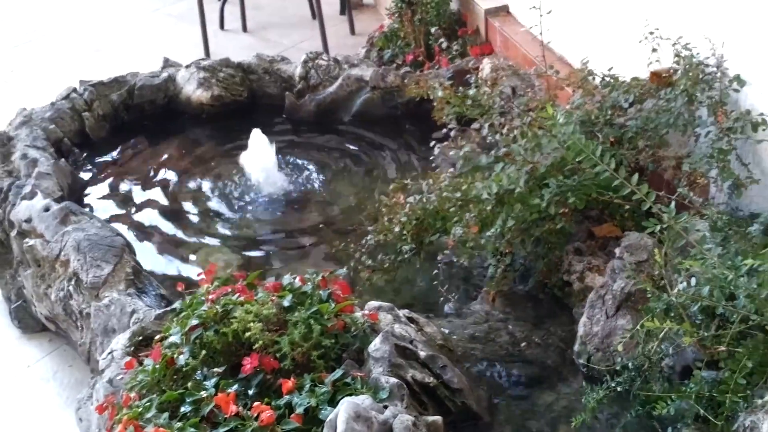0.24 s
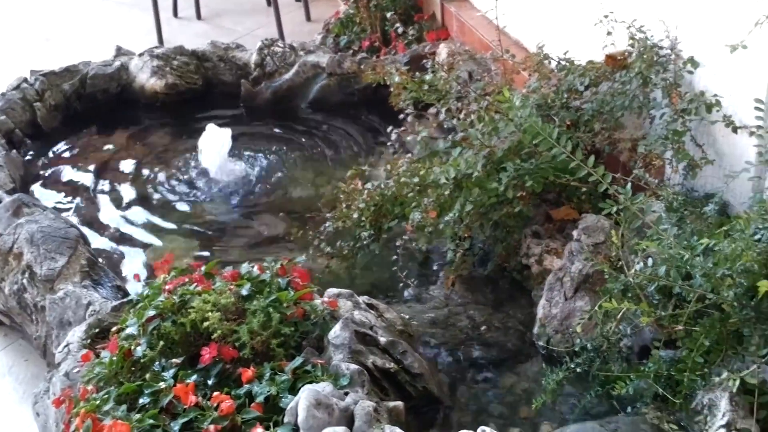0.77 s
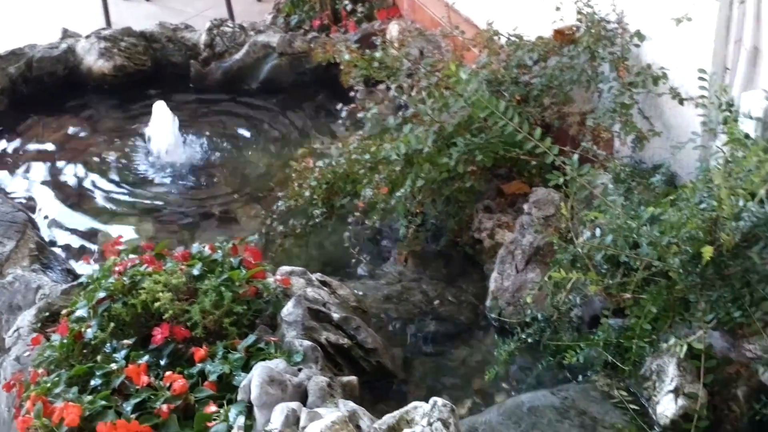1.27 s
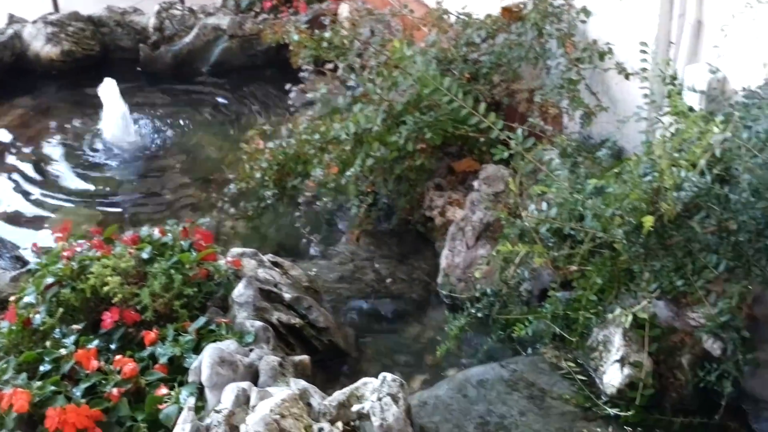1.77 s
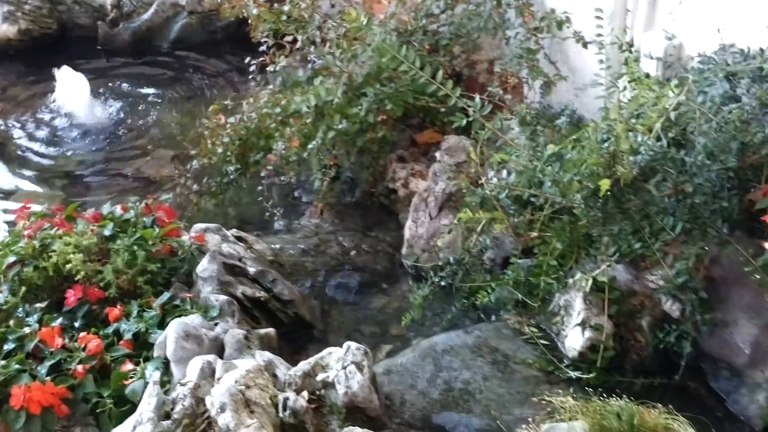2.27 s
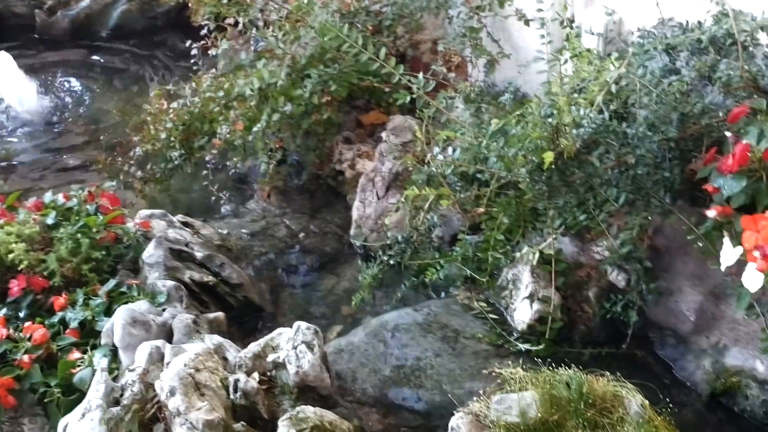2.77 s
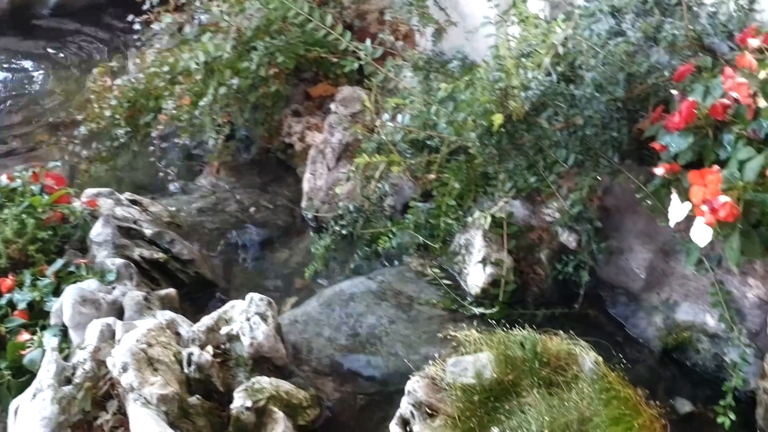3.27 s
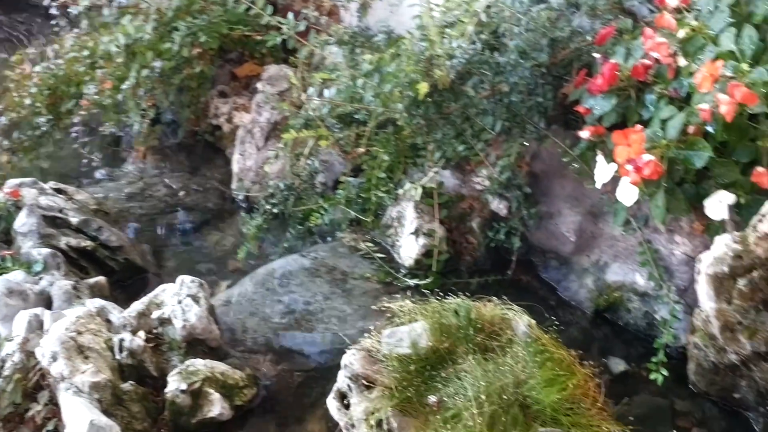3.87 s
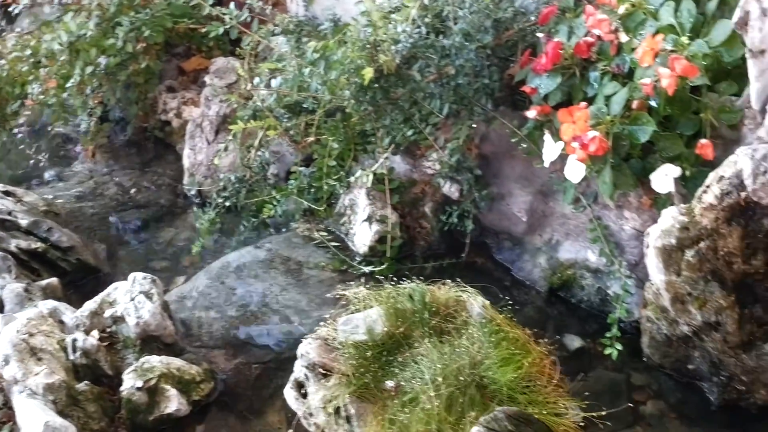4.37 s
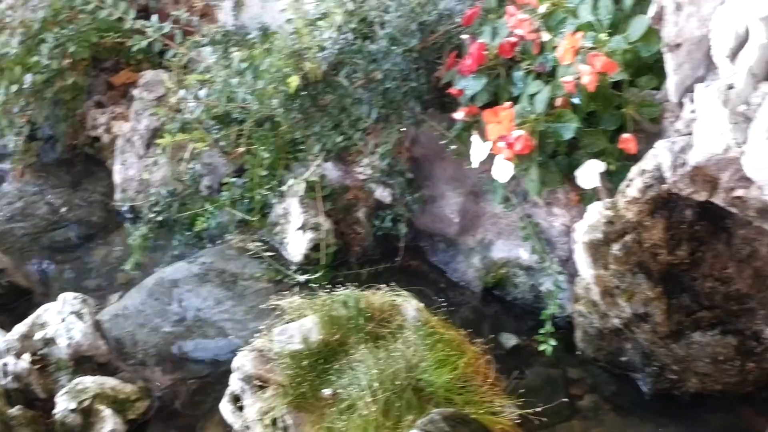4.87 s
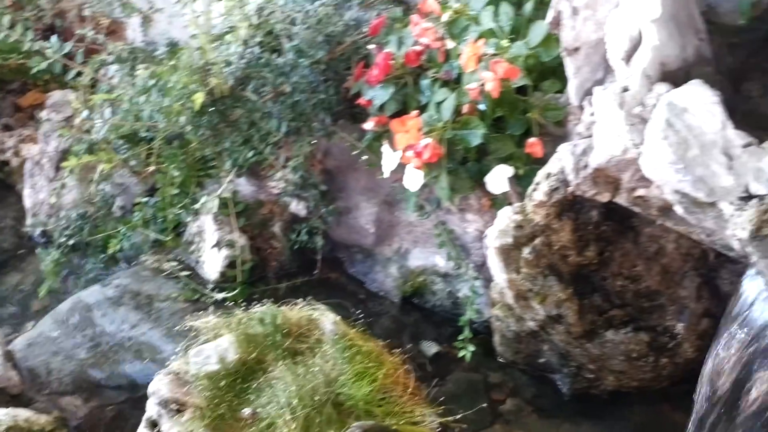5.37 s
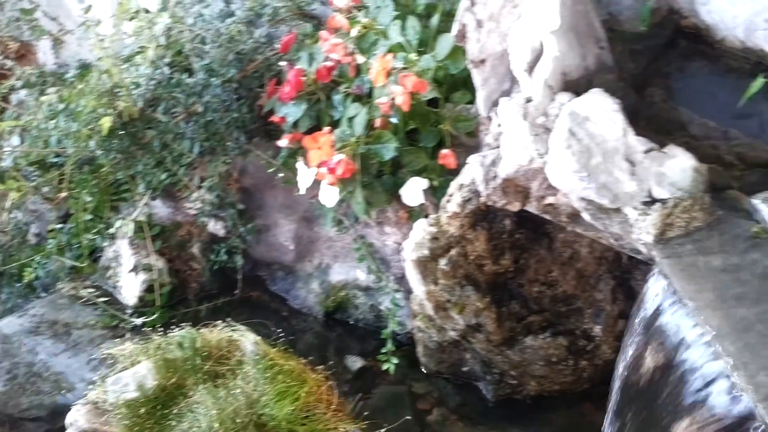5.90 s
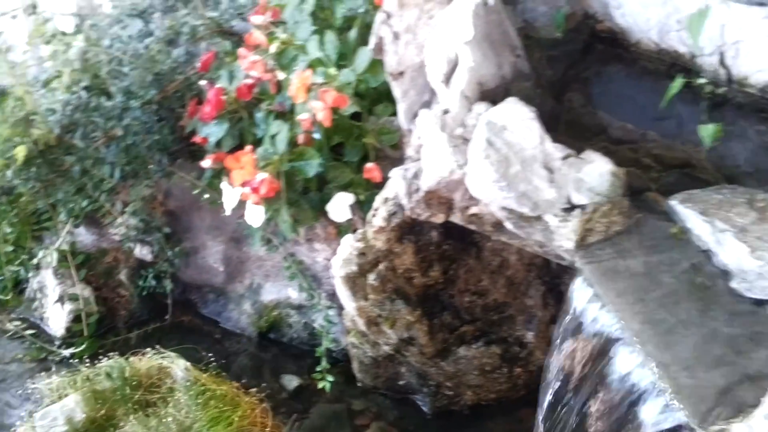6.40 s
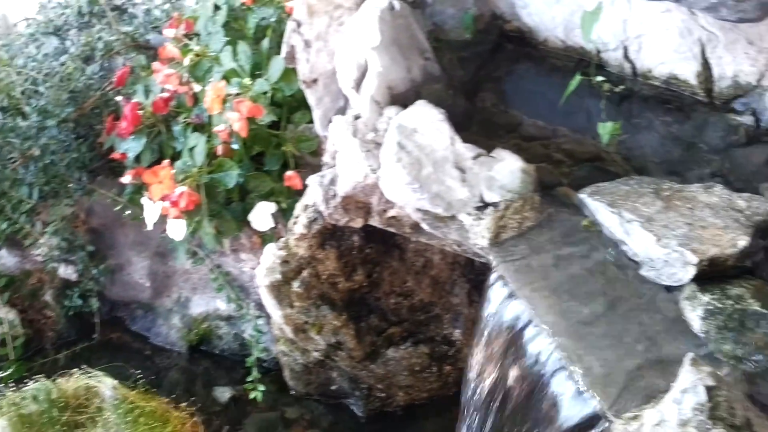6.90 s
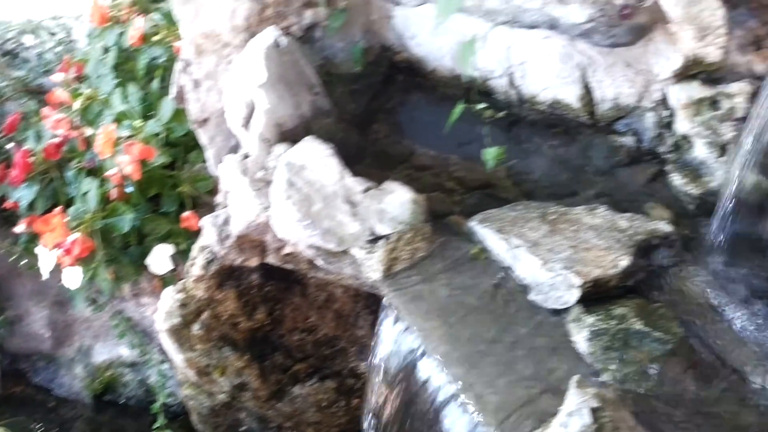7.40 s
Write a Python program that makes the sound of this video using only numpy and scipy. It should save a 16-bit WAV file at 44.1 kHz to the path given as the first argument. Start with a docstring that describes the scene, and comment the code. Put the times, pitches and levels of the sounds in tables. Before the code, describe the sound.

Steady hissing, trickling water in a rock garden, full of crisp slaps and bubbly plops, shifting from bright jet splatter to lower waterfall babble.

```python
"""A frothy jet falls back into the basin of a rock-garden fountain; a sheet of water spills over
a stone lip, and a pool gurgles between. Each is a wash of noise bands plus a fizz of single ringing bubbles.
Slaps (clicks with noise), plops (rising notes) and spray (bright ticks) fall at set and random times.
The microphone turns slowly from jet to waterfall; echoes, ringing stone, a rumble and a faint hum join in."""
import sys
import numpy as np
from scipy import signal
from scipy.io import wavfile

SR = 44100
rng = np.random.default_rng(int(sys.argv[2]) if len(sys.argv) > 2 else 0)


def unload_wav(signal):
    """Save mono or channel-first audio to the path in sys.argv[1] as 16-bit WAV at rate SR, clipped to [-1, 1]."""
    wavfile.write(
        sys.argv[1],
        SR,
        np.round(np.clip(np.atleast_2d(signal).T, -1, 1) * 32767).astype(np.int16),
    )


N = 337365   # length in samples


def from_db(db):
    """Turn decibels into a gain."""
    return 10 ** (np.asarray(db) / 20)


def rms_one(x):
    """Scale a signal to an average (rms) strength of 1."""
    return x / np.sqrt(np.mean(x ** 2) + 1e-20)


def drift(rate_hz):
    """Slow random wandering of spread 1: noise smoothed twice, worked out at every 40th sample."""
    step = 40
    r = np.exp(-2 * np.pi * rate_hz * step / SR)
    noise = rng.standard_normal(N // step + 2002)
    slow = signal.lfilter([1], [1, -2 * r, r * r], noise)[2000:]   # skip the filter's start
    return np.interp(np.arange(N) / step, np.arange(len(slow)), rms_one(slow))


def ring(clicks, hz, t60):
    """Each click sets off a sine that fades by 60 dB in t60 seconds, as in a struck bubble."""
    r = from_db(-60 / (t60 * SR))
    w = 2 * np.pi * hz / SR
    return signal.lfilter([0, np.sin(w)], [1, -2 * r * np.cos(w), r * r], clicks + 1e-18)


def add(out, s, sound):
    """Mix a short sound in at a time in seconds."""
    at = round(s * SR)
    out[at:at + len(sound)] += sound[:N - at]


def chirp(t, hz, rise, t60):
    """A bubble's note: quick onset, then a fade, with the pitch rising as it nears the surface."""
    note = np.sin(2 * np.pi * hz * t * (1 + rise * t / t60))
    onset = 1 - np.exp(-.6 * hz * t)
    return note * from_db(-60 * t / t60) * onset


# How strongly each source is heard as the microphone turns and the water surges, before the layer gains:
# (t/s, jet level/dB, waterfall level/dB, pool level/dB)
SOURCE_LEVELS = [(0.0, -27, -34, -38), (0.45, -26, -31.5, -36.5), (0.74, -28, -34, -38.5),
                 (1.17, -26, -33.5, -35.5), (1.73, -28.5, -34.5, -37.5), (2.15, -26, -31, -36.5),
                 (2.79, -31, -34.5, -38.5), (3.26, -29, -33, -34.5), (3.642, -33, -34, -36.5),
                 (4.67, -34, -34, -37.5), (5.88, -34.5, -31.5, -37), (6.44, -33, -31, -37.5),
                 (7.01, -31, -29, -38), (7.46, -31.5, -31.5, -39.5), (7.65, -31, -27.5, -33.5)]


def flow_at(s):
    """Levels in dB of jet, waterfall and pool at the given times, joined by straight lines."""
    times, *levels_db = np.transpose(SOURCE_LEVELS)
    return [np.interp(s, times, db) for db in levels_db]


def band_powers(spectrum, main_band, hz):
    """Power of a source in each log-spaced band, summing to 1 over its main band."""
    known_hz, db = np.transpose(spectrum)
    per_hz = from_db(2 * np.interp(np.log(hz), np.log(known_hz), db, left=-90, right=-90))
    power = hz * per_hz   # higher bands are wider
    in_main = (hz > main_band[0]) & (hz < main_band[1])
    return power / power[in_main].sum()


# Tone colour of the jet: (f/Hz, relative level per Hz/dB)
JET_SPECTRUM = [(1470, -67), (2500, -13), (2850, 11.5), (3280, -12), (4080, 4), (5970, 10.5), (7890, 3),
                (9960, -5), (14800, -12), (16000, -4)]
# Tone colour of the waterfall: (f/Hz, relative level per Hz/dB)
WATERFALL_SPECTRUM = [(650, -19.5), (1100, -7), (1330, -8.5), (1610, -3), (1910, 0), (2260, -2), (2450, -4),
                      (2650, -1.5), (3480, -2.5), (3830, -0.5), (5040, -2), (5450, -41), (8240, -14),
                      (9000, -23.5), (11700, -28), (19800, -120)]
# Tone colour of the pool: (f/Hz, relative level per Hz/dB)
POOL_SPECTRUM = [(90, -30), (134, -28), (164, 3), (221, 2), (370, -11.5), (416, -3), (483, 0), (662, -1),
                 (744, -15.5), (988, 2.5), (1170, -9), (1230, 0), (1600, -2.5), (2080, -37), (3520, -120)]
# Where the level of jet, waterfall and pool counts: (lowest f/Hz, highest f/Hz)
SOURCE_BANDS = [(4500, 12000), (1400, 4000), (150, 1300)]


def band_gains(hz):
    """Gain over time of every band: the powers of the three sources add up."""
    heard = from_db(2 * np.array(flow_at(np.arange(N) / SR)))
    spectra = (JET_SPECTRUM, WATERFALL_SPECTRUM, POOL_SPECTRUM)
    powers = [band_powers(spectrum, band, hz) for spectrum, band in zip(spectra, SOURCE_BANDS)]
    return (np.sqrt(share @ heard) for share in np.transpose(powers))


WASH_DB = -7.5
SURGE_DB, SURGE_BELOW_HZ = 3, 400   # the low wash gurgles unevenly


def wash(churn, churn_db, patchy_db):
    """Countless bubbles blur into sixth-octave noise bands that swell with the churn and flicker alone."""
    edges = 25 * 2 ** (np.arange(57) / 6)
    white = rng.standard_normal((2, N))
    out = np.zeros(N)
    surge = from_db(SURGE_DB * drift(11.0))
    for k, gain in enumerate(band_gains(np.sqrt(edges[1:] * edges[:-1]))):
        band_filter = signal.butter(2, edges[k:k + 2], "band", fs=SR, output="sos")
        band = signal.sosfilt(band_filter, white[k % 2])   # neighbours use different noise
        if edges[k] < SURGE_BELOW_HZ:
            gain = gain * surge
        flicker = from_db(churn_db * churn + patchy_db * drift(44))
        out += gain * flicker * rms_one(band)
    return out


FIZZ_DB, BURBLE_DB = -7.5, -7.5   # short bubbles, and longer-singing ones
SIZE_SPREAD_DB = 2.5


def fizz(churn, per_s, cycles, clump_db):
    """Single bubbles born in clumps, mostly small; each swells and dies at the pitch of its size."""
    strength = from_db(SIZE_SPREAD_DB * np.minimum(rng.exponential(1, N), 4.0)) * rng.choice([-1, 1], N)
    born = rng.random(N) < per_s * from_db(clump_db * churn) / SR
    pitches = np.geomspace(170, 15500, 48)
    odds = np.sqrt(pitches) / np.sqrt(pitches).sum()   # small, high bubbles are the commonest
    dealt = rng.choice(len(pitches), N, p=odds)
    out = np.zeros(N)
    for k, gain in enumerate(band_gains(pitches)):
        hz, t60 = pitches[k], cycles / pitches[k]
        clicks = strength * born * (dealt == k)
        pinched_off = ring(ring(clicks, hz, t60), hz, 0.16 * t60)   # pinch-off takes a few cycles
        out += gain * rms_one(pinched_off)
    return out


RUMBLE_DB, RUMBLE_HZ, RUMBLE_LUMP_DB = -82, 65, 4.5
RUMBLE_FOLLOWS = 2.5   # power of the froth gain
HUM_HZ, HUM_DB, HUM_WAVER_DB = 100, -71, -3


def rumble(froth):
    """Lumpy low-passed noise swells with the froth; a faint sine hum comes and goes."""
    low_pass = signal.butter(2, RUMBLE_HZ, fs=SR, output="sos")
    low = signal.sosfilt(low_pass, rng.standard_normal(N))
    lumps = from_db(RUMBLE_DB + RUMBLE_LUMP_DB * drift(4.0)) * froth ** RUMBLE_FOLLOWS * rms_one(low)
    hum = np.sin(2 * np.pi * HUM_HZ * np.arange(N) / SR)
    return lumps + from_db(HUM_DB + HUM_WAVER_DB * drift(1.5)) * hum


SPRAY_PER_S, SPRAY_CYCLES = 300, 20
SPRAY_DB = -4   # relative to the jet
SPRAY_HZ = (6500, 7600, 9000, 10800, 13000)
SPRAY_TILT_DB = -9   # per octave of droplet pitch


def spray():
    """Lone droplets off the jet tick on stone: brief high ringing of uneven size and pitch."""
    sizes = from_db(5.3 * np.minimum(rng.exponential(1, N), 2.5)) * rng.choice([-1, 1], N)
    lands = rng.random(N) < SPRAY_PER_S / SR
    dealt = rng.integers(0, len(SPRAY_HZ), N)
    ticks = np.zeros(N)
    for k, hz in enumerate(SPRAY_HZ):
        tilt = from_db(SPRAY_TILT_DB * np.log2(hz / SPRAY_HZ[0]))
        ticks += tilt * ring(sizes * lands * (dealt == k), hz, SPRAY_CYCLES / hz)
    jet_db = flow_at(np.arange(N) / SR)[0]
    return from_db(jet_db + SPRAY_DB) * ticks


# Small bubbles of jet, waterfall and pool: (typical f/Hz, level above its source/dB)
SMALL_BUBBLES = [(3010, -3.5), (1900, 0), (900, 1.5)]
# How many small bubbles each source gets: (jet, waterfall, pool)
SMALL_BUBBLE_COUNTS = (320, 620, 300)
PLOP_PITCH_SPREAD, PLOP_SPREAD_DB, SMALL_PLOP_CYCLES = 0.201, 1.5, 50


def small_plops():
    """Random bubbles that follow the level of their source; larger, lower ones ring longer."""
    rows = []
    for k, ((typical_hz, above_db), count) in enumerate(zip(SMALL_BUBBLES, SMALL_BUBBLE_COUNTS)):
        s = rng.random(count) * (N - 1) / SR
        pitch, size = rng.standard_normal((count, 2)).T
        hz = typical_hz * np.exp(PLOP_PITCH_SPREAD * pitch)
        db = flow_at(s)[k] + above_db + PLOP_SPREAD_DB * size
        rows += zip(s, db, hz, SMALL_PLOP_CYCLES / hz)
    return rows


# Loud trapped bubbles: (t/s, level/dB, f/Hz, time to fade 60 dB/s)
LOUD_PLOPS = [(0.008, -19, 2460, 0.028), (0.104, -23.5, 1040, 0.041), (0.115, -19.5, 660, 0.034),
              (0.139, -25, 900, 0.041), (0.138, -22, 3050, 0.03), (0.15, -22, 2160, 0.034),
              (0.175, -35, 1790, 0.03), (0.22, -24, 1760, 0.029), (0.25, -34, 1710, 0.24),
              (0.319, -20.5, 2840, 0.03), (0.352, -24, 2900, 0.04), (0.432, -20, 2820, 0.039),
              (0.433, -13.5, 1750, 0.045), (0.435, -15, 1950, 0.035), (0.588, -21, 1640, 0.034),
              (0.63, -24, 1690, 0.034), (0.64, -20, 2900, 0.04), (0.661, -28, 2720, 0.04),
              (0.679, -20, 3240, 0.025), (0.8, -24, 3900, 0.025), (0.654, -24, 1760, 0.025),
              (0.742, -23, 1430, 0.03), (0.81, -22, 1850, 0.039), (1.247, -25, 1666, 0.04),
              (1.987, -25, 1440, 0.033), (2.227, -23, 1290, 0.03), (2.342, -29, 1640, 0.03),
              (2.448, -15, 1620, 0.019), (2.767, -16, 1310, 0.023), (2.855, -18.5, 1005, 0.033),
              (3.051, -32, 944, 0.11), (3.115, -22, 1470, 0.029), (3.127, -28.5, 1715, 0.21),
              (3.13, -25, 510, 0.069), (3.14, -28, 1250, 0.05), (3.17, -20, 1780, 0.026),
              (3.211, -24, 1400, 0.046), (3.23, -25, 990, 0.09), (3.25, -21, 1200, 0.033),
              (3.252, -22, 880, 0.035), (3.26, -34, 1750, 0.04), (3.269, -26, 1320, 0.056),
              (3.288, -25, 1210, 0.05), (3.31, -30, 900, 0.069), (3.346, -21, 1370, 0.027),
              (3.346, -26, 1760, 0.03), (3.501, -20, 1410, 0.054), (3.532, -21.5, 1750, 0.046),
              (3.789, -16, 1615, 0.039), (3.846, -21, 1350, 0.021), (3.866, -7.5, 1490, 0.011),
              (3.588, -23, 1750, 0.025), (4.013, -29, 800, 0.056), (4.139, -25, 950, 0.034),
              (4.568, -24, 1740, 0.022), (4.612, -22, 2070, 0.039), (4.631, -22, 1480, 0.04),
              (4.632, -21, 1180, 0.034), (4.675, -27, 1730, 0.039), (4.649, -28, 1730, 0.04),
              (4.71, -25, 1690, 0.03), (4.69, -24, 2120, 0.037), (4.715, -24, 2340, 0.03),
              (4.754, -23.5, 1760, 0.03), (4.755, -22, 2250, 0.03), (4.755, -27, 1000, 0.035),
              (4.782, -28, 980, 0.04), (4.786, -26, 1740, 0.03), (4.79, -26, 2120, 0.04),
              (4.82, -33, 1730, 0.04), (4.85, -31, 2200, 0.028), (4.886, -31, 2210, 0.03),
              (4.9, -26, 1720, 0.037), (4.945, -25, 1250, 0.021), (4.939, -20.5, 1683, 0.04),
              (5.022, -26, 2020, 0.033), (5.024, -19, 1300, 0.025), (5.028, -22, 920, 0.027),
              (5.03, -23, 1670, 0.027), (5.147, -29, 1710, 0.066), (5.195, -26, 2110, 0.025),
              (5.212, -32, 1710, 0.04), (5.27, -23, 2010, 0.03), (5.31, -26, 1960, 0.057),
              (5.348, -26, 1700, 0.062), (5.365, -17.5, 2300, 0.025), (5.429, -25.5, 2000, 0.051),
              (5.57, -28, 1680, 0.025), (5.623, -25, 1730, 0.03), (5.646, -23, 2040, 0.05),
              (5.66, -27, 2000, 0.054), (5.747, -24, 2450, 0.025), (6.007, -23, 2080, 0.03),
              (6.049, -20, 2580, 0.025), (6.084, -15.5, 1560, 0.03), (6.26, -16, 1670, 0.025),
              (6.264, -17.5, 1900, 0.064), (6.267, -15, 2210, 0.026), (6.303, -23, 2130, 0.04),
              (6.425, -25, 1990, 0.061), (6.506, -30, 1920, 0.03), (6.541, -23, 1900, 0.047),
              (6.708, -32, 2140, 0.03), (6.725, -19, 1670, 0.033), (6.759, -18, 2380, 0.035),
              (6.887, -20, 2020, 0.037), (6.937, -24, 1110, 0.039), (6.969, -25, 1980, 0.044),
              (7.103, -11.5, 1850, 0.016), (7.163, -27, 1840, 0.028), (7.262, -24, 1950, 0.024),
              (7.495, -15.5, 960, 0.023), (7.524, -22, 1980, 0.034)]
SPATTER_DB = -6.5   # neighbours of a large bubble, relative to its note


def plops(rows):
    """Each trapped bubble sings one short rising note amid a noisy spatter of neighbours."""
    out = np.zeros(N)
    for (s, db, hz, t60), noise in zip(rows, rng.standard_normal((len(rows), 5000))):
        noise = noise[:int(t60 * SR)]
        t = np.arange(len(noise)) / SR
        fade = from_db(-60 * t / t60) * (1 - np.exp(-.6 * hz * t))
        spatter = rms_one(ring(noise, hz, 4.0 / hz)) * fade
        add(out, s, from_db(db) * chirp(t, hz, 0.051, t60) + from_db(db + SPATTER_DB) * spatter)
    return out


# Pockets in the stone that ring along: (f/Hz, width/Hz, level/dB)
STONE_POCKETS = [(1737, 34, -5.5), (2167, 29, -13), (986, 17, -16), (2980, 64, -17.5)]
# Echoes off the rocks: (delay t/s, level/dB)
ROCK_ECHOES = [(.0091, -20), (.017, -17.5)]


def rocks(x):
    """The stone rim sends back early echoes, and pockets in the stone ring at their own notes."""
    out = x.copy()
    for hz, width, db in STONE_POCKETS:
        out += from_db(db) * signal.lfilter(*signal.iirpeak(hz, hz / width, fs=SR), x)
    for delay, db in ROCK_ECHOES:
        add(out, delay, from_db(db) * x)
    return out


# Air gulped into hollows: (t/s, peak level/dB, starting f/Hz, length/s)
AIR_GULPS = [(0.016, -30, 480, 0.023), (1.186, -34, 594, 0.027), (3.116, -27, 930, 0.025),
             (3.411, -31, 814, 0.013), (3.452, -27, 193, 0.018), (3.517, -34, 172, 0.047),
             (4.093, -35, 635, 0.027), (4.468, -31, 653, 0.018), (4.486, -28, 647, 0.042),
             (4.675, -37, 810, 0.038), (4.798, -30, 583, 0.023), (4.955, -29, 223, 0.021),
             (5.448, -30.5, 705, 0.02), (5.472, -31, 590, 0.038), (5.49, -32, 860, 0.019),
             (5.522, -37, 873, 0.05), (5.71, -41, 550, 0.023), (6.963, -29.5, 870, 0.038),
             (7.177, -29, 172, 0.024), (7.374, -33, 1025, 0.05)]


def gulps():
    """Air gulped into a hollow gives a slightly rising note that swells and fades."""
    out = np.zeros(N)
    for s, db, hz, length in AIR_GULPS:
        t = np.arange(int(length * SR)) / SR
        note = np.sin(2 * np.pi * hz * t * (1 + 0.071 * t / length))
        swell = np.sin(np.pi * (t / length) ** 0.34)
        add(out, s, from_db(db) * note * swell)
    return out


SMALL_SLAP_COUNT = 60
JET_SLAP_HZ, FALL_SLAP_HZ, SLAP_PITCH_SPREAD = 5900, 3900, 0.073
SMALL_CLICK_DB, SMALL_CRACK_DB, SMALL_FROTH_DB = 7, -1, -2   # relative to the source
SMALL_SPREAD_DB, SMALL_FROTH_T60_S = 3.5, 0.035


def small_slaps():
    """Random slaps of jet or waterfall: the louder source slaps more often, each at its own pitch."""
    when, which = rng.random((SMALL_SLAP_COUNT, 2)).T
    chance = np.clip(rng.standard_normal((SMALL_SLAP_COUNT, 4)).T, -2.5, 1.3)   # no very big ones
    pitch, click, crack, froth = chance
    s = when * (N - 1) / SR
    jet_db, fall_db, _ = flow_at(s)
    from_jet = which < 1 / (1 + from_db(2 * (fall_db - jet_db)))
    db = np.where(from_jet, jet_db, fall_db)
    hz = np.where(from_jet, JET_SLAP_HZ, FALL_SLAP_HZ) * np.exp(SLAP_PITCH_SPREAD * pitch)
    click_db = db + SMALL_CLICK_DB + SMALL_SPREAD_DB * click
    crack_db = db + SMALL_CRACK_DB + SMALL_SPREAD_DB * crack
    froth_db = db + SMALL_FROTH_DB + SMALL_SPREAD_DB * froth
    return list(zip(s, click_db, hz, crack_db, froth_db, np.full(len(s), SMALL_FROTH_T60_S)))


# Loud slaps of water on water; crack and froth levels are before their fades and the crack's filter:
# (t/s, click peak level/dB, bubble f/Hz, crack level/dB, froth level/dB, froth time to fade 60 dB/s)
LOUD_SLAPS = [(0.128, -30, 4480, -24, -7, 0.0069), (0.192, -17, 6730, -26, -17, 0.02),
              (0.2538, -19, 7100, -24, -20, 0.1), (0.348, -27, 6460, -25, -8, 0.014),
              (0.411, -6, 6200, -21, -10, 0.03), (0.4273, -12, 5900, -13, -10, 0.031),
              (0.4764, -22, 6070, -26, -20, 0.02), (0.502, -5, 5400, -21, -20, 0.039),
              (0.517, -14, 5200, -26, -13, 0.025), (0.5616, -24, 6090, -26, -26, 0.02),
              (0.632, -15, 5500, -29, -19, 0.05), (0.643, -20, 5600, -21, -19, 0.056),
              (0.662, -20, 6000, -23, -22, 0.04), (0.7178, -24, 5940, -27, -19, 0.018),
              (0.858, -11, 5590, -17, -29, 0.021), (0.915, -20, 5900, -28, -16, 0.04),
              (0.921, -13, 5640, -24, -17, 0.04), (0.946, -15, 6300, -26, -11, 0.015),
              (0.958, -6, 6530, -30, -14, 0.023), (1.005, -13, 6650, -26, -17, 0.029),
              (1.046, -19, 5990, -26, -30, 0.022), (1.1074, -18, 6680, -26, -30, 0.02),
              (1.153, -13, 7200, -20, -3, 0.0099), (1.1756, -18, 6700, -3, 0, 0.0069),
              (1.2128, -8, 6200, -19, -5, 0.015), (1.3937, -19, 6060, -27, -17, 0.028),
              (1.464, -19, 6490, -27, -18, 0.02), (1.532, -17, 5530, -19, -15, 0.022),
              (1.704, -20, 5960, -27, -18, 0.025), (1.761, -23, 5870, -14, -8, 0.013),
              (1.846, -22, 5790, -27, -14.5, 0.029), (1.8784, -18, 5990, -29, -32, 0.02),
              (1.952, -20, 5950, -17, -14, 0.028), (1.9845, -28, 4050, -22, -12.5, 0.019),
              (2.107, -18, 5670, -13, -2.5, 0.02), (2.109, -19, 3600, -28, -11, 0.015),
              (2.153, -18, 5800, -27, -20, 0.03), (2.2007, -8, 5900, -18, -3, 0.0086),
              (2.272, -17, 4830, -19, -36, 0.024), (2.361, -22, 5680, -25, -17, 0.02),
              (2.4399, -27, 5860, -26, -31, 0.02), (2.519, -15, 4470, -23, -23, 0.043),
              (2.583, -14, 5790, -26, -27, 0.022), (2.675, -19, 5300, -30, -19, 0.044),
              (2.708, -25, 4320, -26, -21, 0.053), (2.816, -24, 7900, -29, -19, 0.02),
              (2.87, -7, 4800, -10.5, -7, 0.012), (2.953, -18, 5570, -15, -29, 0.026),
              (3.05, -25, 4800, -13, -7, 0.012), (3.072, -26, 4730, -30, -20, 0.06),
              (3.1215, -12, 5270, -17, -9.5, 0.021), (3.2052, -16, 5850, -16, -4.5, 0.029),
              (3.211, -6, 5760, -21, -14, 0.023), (3.31, -12, 5600, -13, -8, 0.014),
              (3.3608, -25, 5410, -30, -17, 0.042), (3.4045, -25, 3770, -32, -15, 0.02),
              (3.456, -29, 3700, -24, -20, 0.024), (3.52, -25, 5500, -19, 2, 0.014),
              (3.573, -13, 6700, -24, -15, 0.024), (3.73, -17, 4700, -33, -15, 0.018),
              (3.761, -18, 5310, -32, -32, 0.015), (3.828, -16, 4440, -28, -29, 0.014),
              (3.845, -14, 6500, -27, -23, 0.015), (3.864, -29, 3960, -3, 1, 0.004),
              (3.925, -21, 5600, -16, -9, 0.015), (3.937, -22, 4500, -30, -16, 0.015),
              (3.974, -20, 4370, -30, -22, 0.019), (4.015, -20, 3830, -28, -5.5, 0.01),
              (4.0436, -26, 3860, -19, -11, 0.011), (4.1015, -23, 5490, -22, -13, 0.015),
              (4.171, -29, 5950, -21, -9, 0.0086), (4.1844, -16, 3950, -24, -19, 0.028),
              (4.2133, -17, 5770, -32, -28, 0.015), (4.3355, -17, 5800, -30, -23, 0.017),
              (4.38, -20, 5340, -25, -16.5, 0.035), (4.4353, -22, 4750, -36, -17, 0.039),
              (4.569, -28, 4150, -23, -15, 0.024), (4.613, -22, 4700, -26, -11.5, 0.015),
              (4.6657, -26, 5130, -24, -17, 0.026), (4.779, -17, 5160, -29, -20, 0.015),
              (4.8438, -19, 4400, -17.5, -32, 0.021), (4.9377, -20, 3360, -26, -21, 0.027),
              (5.1208, -19, 4840, -21, -24, 0.022), (5.16, -16.5, 4500, -33, -30, 0.015),
              (5.2713, -13, 4870, -24, -12, 0.025), (5.284, -18, 4730, -26, -0.5, 0.0087),
              (5.3193, -17, 4030, -27, -18, 0.02), (5.366, -28, 5200, -32, -6, 0.008),
              (5.4296, -17, 3780, -29, -11, 0.013), (5.565, -16, 5430, -27, -23, 0.018),
              (5.682, -26, 4850, -27, -14.5, 0.02), (5.845, -16, 2960, -30, -16, 0.02),
              (5.908, -28, 3300, -32, -11.5, 0.021), (6.007, -24, 3010, -29, -22, 0.042),
              (6.215, -13.5, 5900, -20, -4.5, 0.01), (6.281, -18, 5500, -21, -15, 0.016),
              (6.31, -22, 3900, -27, -18, 0.022), (6.354, -12, 4930, -30, -16, 0.025),
              (6.421, -17, 5200, -30, -19, 0.018), (6.5275, -31, 4200, -19, -6, 0.0089),
              (6.7127, -19, 5030, -33, -33, 0.015), (6.7567, -18, 4700, -16, -9, 0.015),
              (6.8887, -17, 3710, -29, -25, 0.015), (6.9294, -17, 4060, -26, -18.5, 0.11),
              (7.119, -9, 5550, -27, -7, 0.022), (7.135, -22, 4800, -14, -25, 0.012),
              (7.251, -24, 4370, -24, -2, 0.0057), (7.3845, -17, 4970, -28, -28, 0.015),
              (7.4892, -25, 3870, -24, -11, 0.025), (7.519, -23, 4600, -24, -9, 0.022),
              (7.526, -19, 4600, -9, -9, 0.013), (7.6236, -27, 3990, -28, -34, 0.015)]
CLICK_CYCLES, FROTH_CYCLES = 13, 9


def slaps(rows):
    """Water hits water: a short click, a bright crack, and noise ringing in bubbles of about one size."""
    out, t = np.zeros(N), np.arange(3000) / SR
    noise = rng.standard_normal((len(rows), 2, len(t)))
    bright = signal.butter(2, [4500, 12500], "band", fs=SR)
    for (s, click_db, hz, crack_db, froth_db, t60), (crack_noise, froth_noise) in zip(rows, noise):
        crack_fade = from_db(-60 * t / (1.1 * t60)) * (1 - np.exp(-t / 0.0014))
        crack = from_db(crack_db) * signal.lfilter(*bright, crack_noise) * crack_fade
        froth_fade = from_db(-60 * t / t60) * (1 - np.exp(-t / 0.0029))
        bubbles = ring(ring(froth_noise, hz, FROTH_CYCLES / hz), hz, FROTH_CYCLES / hz)
        burst = from_db(froth_db) * rms_one(bubbles) * froth_fade
        click = chirp(t, hz, 0.034, CLICK_CYCLES / hz)
        add(out, s, crack + burst + from_db(click_db) * click / np.abs(click).max())
    return out


def wake(rows, gain_db, t60, rise_s):
    """After each slap the steady water froths up and settles: a gain of 1 or more."""
    columns = np.transpose(rows)
    s, froth_db = columns[0], columns[4]
    kicks = np.zeros(N)
    kicks[np.round(s * SR).astype(int)] = from_db(froth_db + gain_db)
    kicks[0] = from_db(4.5)   # a surge is just dying away at the start
    rise = np.exp(-1 / (rise_s * SR))
    settle = from_db(-60 / (t60 * SR))
    return 1 + signal.lfilter([1 - rise], np.convolve([1, -rise], [1, -settle]), kicks)


# Loud droplets of spray: (t/s, relative level/dB, f/Hz)
LOUD_DROPLETS = [(0.4968, -23, 10600), (0.7647, -20, 13300), (0.7784, -27, 9500), (0.9258, -21, 10900),
                 (1.0789, -22, 10500), (1.1488, -17, 9640), (1.3309, -14, 11400), (1.3673, -17, 9920),
                 (1.4431, -29, 10100), (1.497, -24, 10200), (2.0208, -15, 11200), (2.3324, -24, 10100),
                 (2.6055, -26, 10100), (2.6219, -14, 9560), (3.3662, -12, 9680), (3.5139, -17, 9890),
                 (4.8299, -21, 9890), (4.9856, -22, 9850), (5.1971, -31, 9790), (5.4705, -26, 9830),
                 (5.4989, -19, 10800), (6.2517, -21, 11100), (6.2662, -23, 9740), (6.539, -23, 10900),
                 (7.1526, -21, 9830)]
DROPLET_T60_S, DROPLET_CYCLES = 0.014, 6.7
DROPLET_DB = -7   # added to every level in the table


def droplets():
    """A larger droplet bursts in a short bright puff of ringing noise."""
    out, t = np.zeros(N), np.arange(900) / SR
    fade = from_db(-60 * t / DROPLET_T60_S) * (1 - np.exp(-t / 0.0006))
    for (s, db, hz), noise in zip(LOUD_DROPLETS, rng.standard_normal((len(LOUD_DROPLETS), len(t)))):
        puff = rms_one(ring(noise, hz, DROPLET_CYCLES / hz)) * fade
        add(out, s, from_db(db + DROPLET_DB) * puff)
    return out


# The middle is hollow while the microphone points between the sources; the waterfall babbles above a lower gap:
# (t/s, depth of the middle gap 0-1, depth of the lower gap 0-1)
HOLLOW_DEPTHS = [(0, 0.03, 0), (1.4, 0.14, 0), (2.4, 0.47, .05), (3.5, 0.6, 0.16), (4.5, 0.43, 0.36),
                 (5.3, 0.42, 0.28), (6, 0.3, 0.48), (7.65, 0.1, 0.33)]
# The middle gap and the lower gap: (centre f/Hz, width/Hz)
HOLLOW_GAPS = [(2720, 700), (1350, 350)]


def hollow(x):
    """Take out part of two bands, to a depth that changes over time."""
    s, *depths = np.transpose(HOLLOW_DEPTHS)
    for (hz, width), depth in zip(HOLLOW_GAPS, depths):
        band = signal.lfilter(*signal.iirpeak(hz, hz / width, fs=SR), x)
        x = x - np.clip(np.interp(np.arange(N) / SR, s, depth), 0, 1) * band
    return x


# Gain of the top treble, which brightens and dulls over time: (t/s, level/dB)
TREBLE_LEVELS = [(0, 3), (1, -1), (1.8, -3.2), (2.5, -0.5), (3.3, -6), (4.2, 2.8), (5, 2), (5.7, -0.2),
                 (6.4, 1), (7.1, -1.2), (7.65, 2)]
TREBLE_HZ = 9500


def treble(x):
    """Lift or lower the top treble by adding or taking away a high-passed copy."""
    s, db = np.transpose(TREBLE_LEVELS)
    top = signal.lfilter(*signal.butter(1, TREBLE_HZ, "high", fs=SR), x)
    gain = np.interp(np.arange(N) / SR, s, from_db(db))
    return x + (gain - 1) * top


MIC_LOW_HZ = 184


def scene():
    """The steady water and its single events, among the rocks."""
    all_slaps = LOUD_SLAPS + small_slaps()
    all_plops = LOUD_PLOPS + small_plops()
    churn = rms_one(drift(20) + 0.82 * drift(40))
    froth = wake(all_slaps, gain_db=1.0, t60=0.14, rise_s=0.0028)
    short = from_db(FIZZ_DB) * fizz(churn, per_s=6000, cycles=13.0, clump_db=2.5)
    singing = from_db(BURBLE_DB) * fizz(churn, per_s=1600, cycles=56.0, clump_db=2.0)
    events = slaps(all_slaps) + plops(all_plops) + gulps() + spray() + droplets()
    near = froth * (short + singing) + events
    far = froth * from_db(WASH_DB) * wash(churn, churn_db=0.5, patchy_db=1.9)
    water = treble(hollow(rocks(near) + far))
    bass_cut = signal.butter(3, MIC_LOW_HZ, "high", fs=SR, output="sos")
    thin = signal.sosfilt(bass_cut, water)   # the small microphone loses the bass
    return (thin + rumble(froth))[None]


CUTOFF_HZ = 16080   # from here up, at least 70 dB down


def record(dry):
    """A steep low-pass cuts off the top."""
    return signal.sosfilt(signal.cheby2(20, 70, CUTOFF_HZ, fs=SR, output="sos"), dry)


dry = scene()
out = record(dry)
unload_wav(out)
```